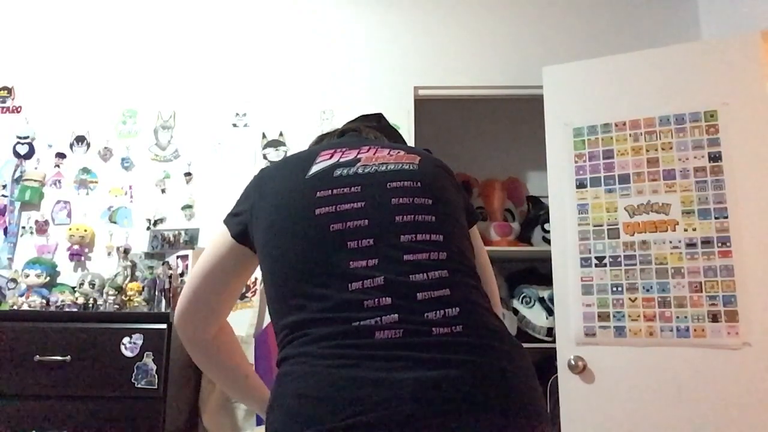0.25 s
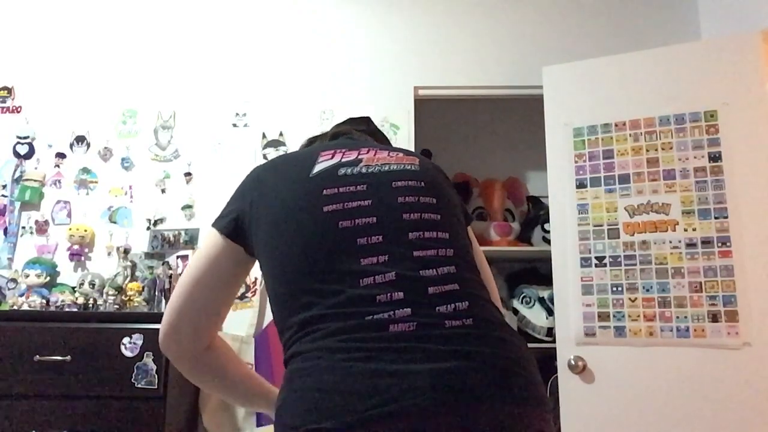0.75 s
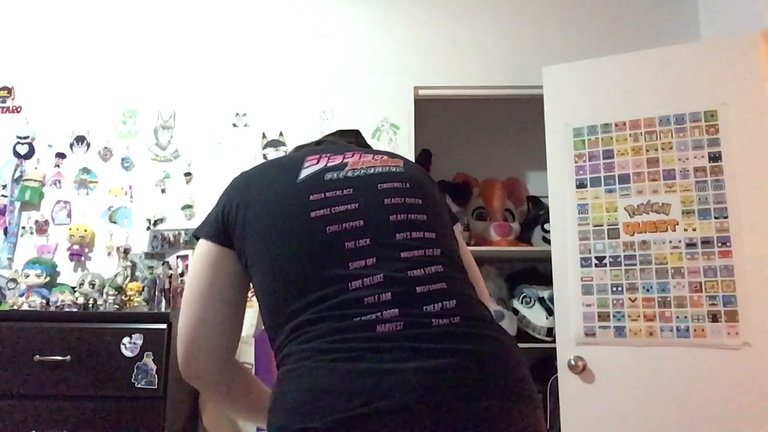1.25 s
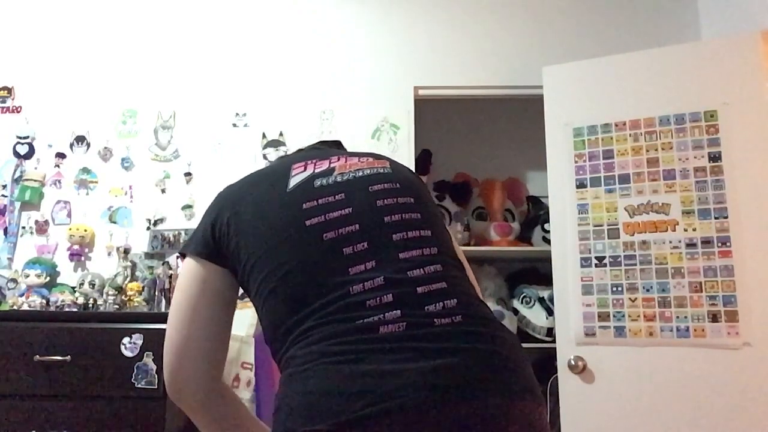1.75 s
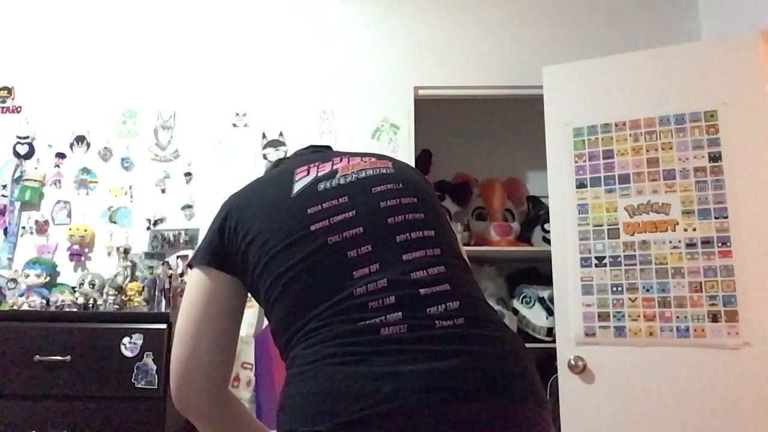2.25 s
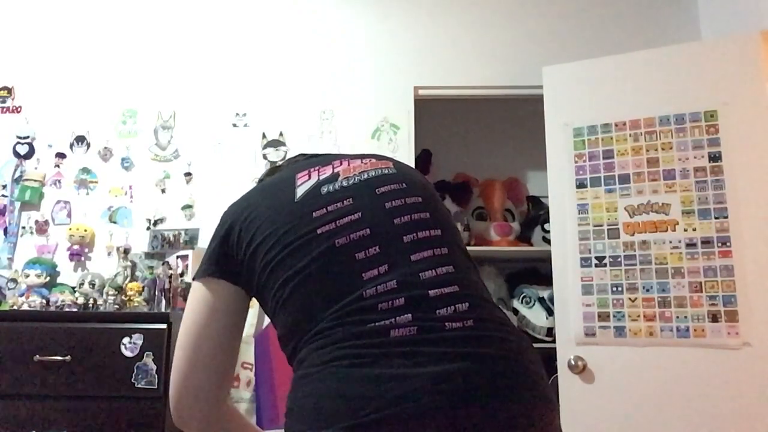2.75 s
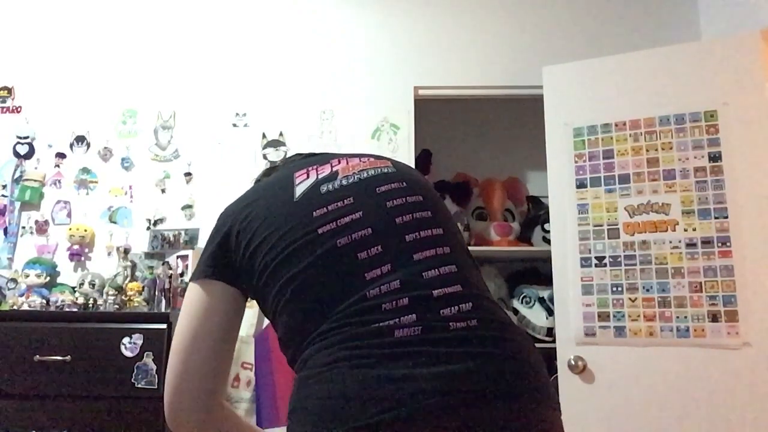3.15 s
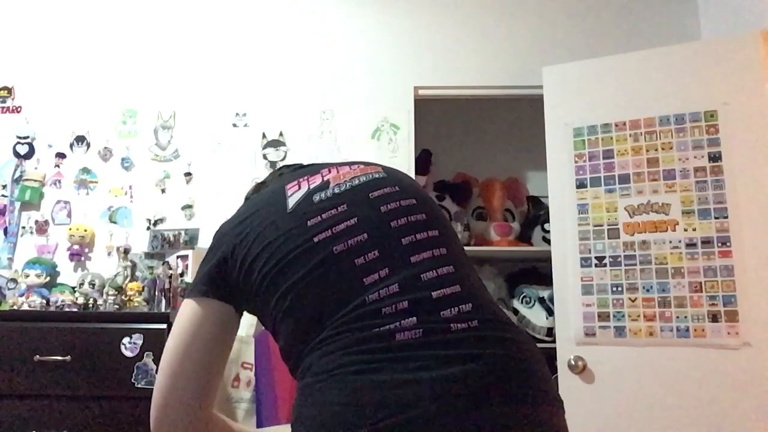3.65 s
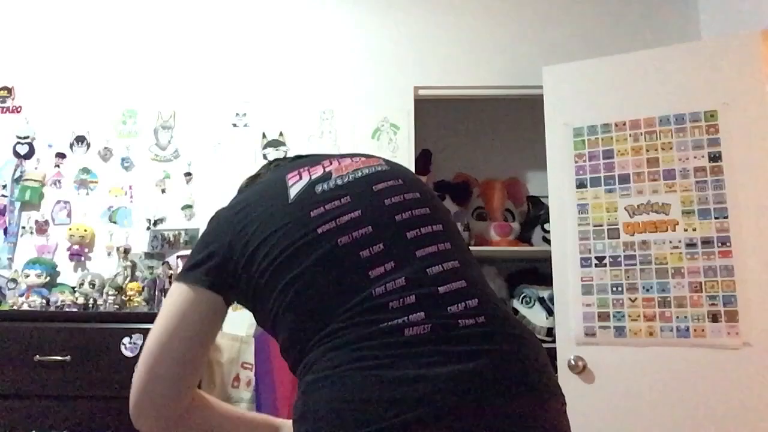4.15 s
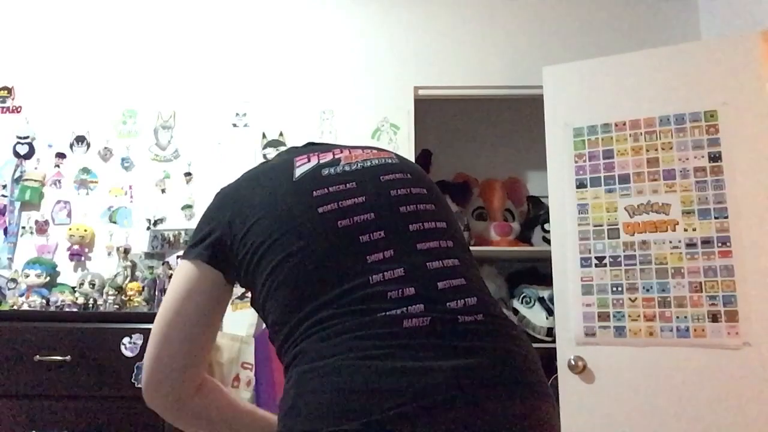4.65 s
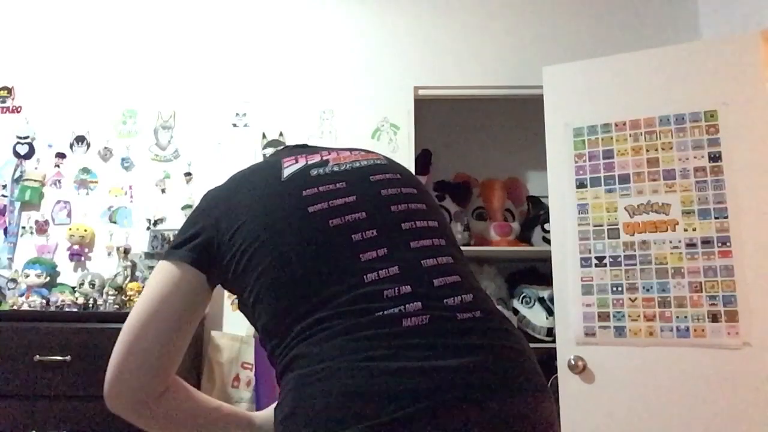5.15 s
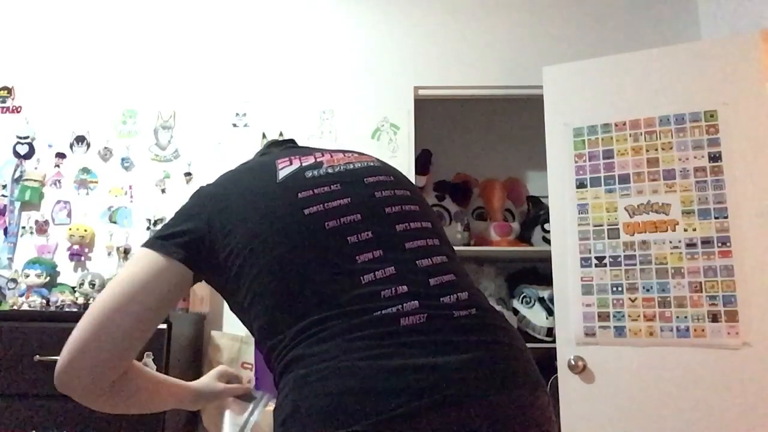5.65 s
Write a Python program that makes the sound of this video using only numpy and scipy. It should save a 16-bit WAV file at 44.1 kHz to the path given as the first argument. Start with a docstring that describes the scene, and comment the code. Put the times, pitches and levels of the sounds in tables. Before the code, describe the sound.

In a small, quiet furnished room, someone handles stiff wrapping a couple of metres from a small microphone. Faint rustles and tiny box taps come first, then short sharp crackles around two and a half and three and a half seconds. The loudest crumpling and hollow cardboard bumps come between about four and a half and five and a half seconds, then light crackles remain over faint hum.

```python
"""Unpacking a parcel

Someone unpacks a parcel by hand in a small furnished room, a couple of metres from the microphone.
Stiff wrapping slides, snaps and crumples in short pulls: crackles made of many tiny noise bursts.
The cardboard box bumps hollowly: short dying tones, coloured by ringing panels.
The crackle arrives mostly by way of the walls, over room air, a faint mains hum and a fading rush.
"""
import sys
import numpy as np
from scipy import signal
from scipy.fft import rfft, irfft
from scipy.io import wavfile
from scipy.ndimage import uniform_filter1d

SR = 44100
rng = np.random.default_rng(int(sys.argv[2]) if len(sys.argv) > 2 else 0)


def output_pcm(signal):
    """Save a mono or channel-first signal as 16-bit PCM at the path in sys.argv[1].

    Samples are clipped to [-1, 1] before scaling.
    """
    pcm = np.clip(np.atleast_2d(signal).T, -1, 1) * 32767
    wavfile.write(sys.argv[1], SR, np.round(pcm).astype(np.int16))


N = 260719
TIME = np.arange(N) / SR  # seconds

# All event levels below are set before the box and the room act on the sound.
# Pulls that crumple the wrapping:
# (time [s], length [s], level [dB], hollow body [dB], treble [dB])
PULLS = [(0.041, 0.033, -52, 5, 2.5), (0.548, 0.19, -52.5, 5, 6.5), (1.624, 0.0089, -49, -10, -7),
         (1.704, 0.035, -50.5, -4, 0), (2.274, 0.01, -38, -13, 10), (2.477, 0.0067, -26, 7, -4),
         (2.498, 0.024, -35, 4.5, 2.5), (2.553, 0.0044, -29, 3, 1.5), (2.818, 0.015, -49, -18, -20),
         (2.954, 0.014, -41, 10.5, 0.5), (3.43, .006, -41, 4.5, 5.5), (3.481, 0.037, -31, 0, -3.5),
         (3.509, 0.026, -21, -1, 2.5), (3.811, 0.016, -50, 2, 9), (3.938, 0.014, -50.5, 5.5, 10),
         (4.55, .04, -49, -8, 10), (4.599, 0.031, -23.5, 4.5, 3.5), (4.636, 0.073, -20, -4, -3.5),
         (4.722, 0.029, -38.5, 13, 4.5), (4.892, 0.0347, -35.5, 9, 7.5), (4.944, 0.01, -29, 15, 7),
         (4.986, 0.023, -30, 8.5, 4.5), (5.051, 0.0085, -31, 9, -7), (5.095, 0.027, -28.5, 3.5, -30),
         (5.153, 0.0093, -30, 4, -1), (5.218, 0.039, -16.5, 4, -8), (5.263, 0.047, -20, -1, -6.5),
         (5.596, 0.031, -46.5, -18, 6), (5.75, 0.018, -47.5, -9, 11.5)]
# Single creases that snap: (time [s], level [dB], ring pitch [Hz], ring against crack [dB])
SNAPS = [(0.54, -37.5, 4180, -2), (1.621, -33.5, 2840, 6), (2.108, -32.5, 3650, -1), (2.191, -36, 7000, -1),
         (2.249, -31, 3600, 9), (2.275, -25.5, 1720, 5), (2.432, -29.5, 3125, -11),
         (2.473, -16.5, 4300, -12), (2.546, -18, 2520, 3), (2.814, -33.5, 3550, 16),
         (2.993, -32.5, 3420, -6), (3.175, -41, 1910, 11), (3.342, -40, 1970, -7), (3.421, -30, 1810, -8),
         (3.481, -19, 2350, 18), (3.733, -41, 2500, 11), (3.895, -33.5, 2640, -4), (3.938, -30.5, 4530, -3),
         (4.216, -25, 4130, -28), (4.346, -31.5, 2220, -15), (4.599, -14.5, 4040, 5),
         (4.946, -25.5, 2030, 11), (5.02, -23, 2000, -7), (5.098, -11.5, 1750, -8), (5.209, -10.5, 1900, 0),
         (5.541, -26.5, 1860, -1), (5.616, -27, 7450, -5), (5.746, -27.5, 1670, 7), (5.843, -33.5, 2100, 4),
         (5.901, -32, 3010, 2)]
# Soft bumps on the box: (time [s], level [dB], pitch [Hz])
BUMPS = [(0.548, -43.5, 283), (0.625, -40, 273), (0.645, -47, 288), (2.482, -29.5, 760),
         (2.486, -28.5, 240), (2.965, -38, 248), (2.972, -41, 120.1), (3.541, -26, 298),
         (4.026, -38.5, 254), (4.050, -45, 308), (4.684, -20.5, 279), (4.756, -38, 120), (4.955, -35, 337),
         (5.020, -25, 407), (5.221, -14.5, 390), (5.254, -25, 145), (5.304, -24, 123), (5.440, -42.5, 173),
         (5.462, -39.5, 106.5), (5.565, -42.5, 427)]
# Strokes of wrapping sliding under the hands: (time [s], length [s], level [dB], treble [dB])
STROKES = [(0.106, 0.34, -61, 7.5), (0.666, 0.091, -53, -13), (0.908, .1, -55.5, -5),
           (1.11, 0.016, -59, -25), (1.388, 0.4, -60, 3), (1.835, 0.26, -65.5, 5.5), (2.079, 0.26, -60, 5),
           (2.577, 0.12, -59.5, -1), (2.879, .06, -63, -8), (3.228, 0.037, -59, -24),
           (3.575, 0.21, -58.5, -8), (3.957, 0.19, -57.5, -6), (4.194, .29, -55, 3),
           (4.488, 0.18, -44.5, 4.5), (4.847, 0.26, -44, 2), (5.272, 0.18, -48.5, -17),
           (5.511, 0.2, -54, -4), (5.882, 0.076, -43, -2)]
# Tone colour of crumpling wrapping: (frequency [Hz], level per Hz [dB])
WRAPPING_SPECTRUM = [(25, -36), (50, -51), (130, -10), (205, -14.5), (300, -0.5), (410, -4.5), (520, -7.5),
                     (800, -3.5), (1100, -8.5), (1650, -4.5), (2200, -8.5), (2900, -7), (5000, -12),
                     (7200, -9.5), (12500, -19), (15800, -26)]
# Tone colour of wrapping rubbing on itself: (frequency [Hz], level per Hz [dB])
RUBBING_SPECTRUM = [(100, -2.5), (300, 8), (600, 2), (1200, 1), (2800, -0.5), (5000, -3.5), (7500, -1.5),
                    (11000, -7.5), (15500, -14.5)]
# Tone colour of a snapping sheet: (frequency [Hz], level per Hz [dB])
SNAP_SPECTRUM = [(150, -11.0), (500, 4.0), (1200, 4.0), (3000, 3.5),
                 (5000, 2.0), (7500, 4.5), (13000, -4.5), (16000, -4.5)]
# Tone colour of still room air: (frequency [Hz], level per Hz [dB])
AIR_SPECTRUM = [(18, -75), (30, -7), (124, -1), (188, -7), (496, -16.5), (698, -18.5), (1490, -18.5),
                (2270, -24.5), (4040, -23), (5120, -34), (11500, -35), (13500, -28), (15800, -45)]
# Panel resonances of the box: (frequency [Hz], width [Hz], level [dB])
BOX_PANELS = [(153.2, 7.2, 10), (272, 34.9, -2), (388, 9.3, -3), (409.3, 5.1, 8), (785, 28, -1),
              (737, 14, -14), (926, 18.7, -7)]
# First reflections from floor, door and walls: (delay before random shift [s], level [dB])
WALL_ECHOES = [(.0052, -6.5), (.0098, -1.5), (0.0128, -4), (0.0167, -15), (.0215, -12.5), (.031, -13)]
# Time the room takes to fade by 60 dB: (frequency [Hz], fade time [s])
ROOM_DECAY = [(100, 0.37), (300, 0.2), (1000, 0.26), (3000, 0.3), (8000, 0.25), (16000, 0.24)]

HUM_HZ, HUM_DB, AIR_DB = 120, -64.5, -61.5
# a soft, dull rush that fades away at first
RUSH_DB, RUSH_HZ, RUSH_WIDTH_HZ, RUSH_FADE_S = -63.5, 850, 530, 0.92
# fingers feel round the box in a loose run of faint taps
FUMBLE_FROM_S, FUMBLE_TO_S, FUMBLE_DB, FUMBLE_HZ = 1.5, 2.2, -47.5, 287
CARDBOARD_DB = 2  # the broad panels radiate well
RESTING_DB = -71  # the wrapping keeps stirring faintly while it is held
# the hand speeds up over the first part of a stroke
STROKE_SWELL_SHARE, STROKE_RELEASE_S = 0.19, 0.027
# the grip bites at once and eases over the length of a pull
PULL_ATTACK_S, PULL_SAG_DB = 0.0013, -4
TOP_HZ = 15900  # highest pitch the microphone passes


def undb(db):
    """Turn decibels into a gain."""
    return 10 ** (np.asarray(db) / 20)


def unit(x):
    """Scale to an average (rms) level of 1."""
    return x / np.sqrt(np.mean(x ** 2) + 1e-20)


def along(points, hz):
    """Read between (frequency [Hz], value) points, with frequency on a log scale."""
    f, value = np.transpose(points)
    return np.interp(np.log(np.maximum(hz, 1)), np.log(f), value)


def convolve(x, response):
    """Filter by an impulse response, keeping the length."""
    return signal.oaconvolve(x, response)[:len(x)]


def colour(x, spectrum, size=2048):
    """Give a sound a tone colour without smearing it backwards; white noise keeps its power."""
    gain = undb(along(spectrum, np.fft.rfftfreq(size, 1 / SR)))
    # folding the cepstrum packs the response as early as possible
    cepstrum = irfft(np.log(gain))
    cepstrum[1:size // 2] *= 2
    cepstrum[size // 2 + 1:] = 0
    response = irfft(np.exp(rfft(cepstrum)))
    return convolve(x, response / np.linalg.norm(response))


def shelf(x, hz, db, kind):
    """Raise or lower everything below ("low" pass) or above ("high" pass) a corner."""
    part = signal.sosfilt(signal.butter(1, hz, "low" if kind == "low" else "high", fs=SR, output="sos"), x)
    return x + (undb(db) - 1) * part


def resonate(x, hz, width_hz):
    """Ring at one pitch, with gain 1 at its centre."""
    b, a = signal.iirpeak(hz, hz / width_hz, fs=SR)
    return signal.lfilter(b, a, x)


def add(track, s, x):
    """Mix a sound in at a time in seconds."""
    start = max(int(s * SR), 0)
    track[start:start + len(x)] += x[:max(N - start, 0)]


def crackle(t, rate, spread_db, grain_s):
    """Tiny creases buckle at random (rate per second): short bursts, most weak and a few strong."""
    size = undb(spread_db * np.minimum(rng.exponential(size=len(t)), 4))
    buckles = rng.random(len(t)) < rate / SR
    energy = buckles * size ** 2
    # the energy of each burst dies away within about grain_s
    energy = signal.lfilter([1], [1, -np.exp(-1 / (grain_s * SR))], energy)
    return unit(np.sqrt(energy) * rng.standard_normal(len(t)))


def background(waver=0.54):
    """Still room air is coloured noise; the mains hum is one slightly wavering tone."""
    knots = TIME[::SR // 8]
    drift = np.interp(TIME, knots, rng.standard_normal(len(knots)))
    hum = np.sqrt(2) * np.sin(2 * np.pi * HUM_HZ * TIME) * (1 + waver * drift)
    air = unit(colour(rng.standard_normal(N), AIR_SPECTRUM))
    return undb(HUM_DB) * hum + undb(AIR_DB) * air


def rush():
    """A faint mid-range rush: noise through two equal resonances, fading into the room air."""
    noise = resonate(rng.standard_normal(N), RUSH_HZ, RUSH_WIDTH_HZ)
    noise = resonate(noise, RUSH_HZ, RUSH_WIDTH_HZ)
    fade = np.exp(-(TIME / RUSH_FADE_S) ** 2)
    return undb(RUSH_DB) * unit(noise) * fade


def fumble(scatter_db=2.0, pitch_scatter=0.18, count=8):
    """Faint finger taps at uneven intervals: rows of (time [s], level [dB], pitch [Hz])."""
    # each random value lies between -1 and 1
    late, strong, high = (2 * rng.random((count, 3)) - 1).T
    progress = (np.arange(count) + .5 + late / 2) / count
    s = FUMBLE_FROM_S + (FUMBLE_TO_S - FUMBLE_FROM_S) * progress
    db = FUMBLE_DB + scatter_db * strong
    hz = FUMBLE_HZ * (1 + pitch_scatter * high)
    return list(zip(s, db, hz))


def bumps(contact_s=0.0014):
    """A hand or the contents nudge the cardboard, which swings for a few cycles."""
    out, t = np.zeros(N), TIME[:SR // 8]
    for s, db, hz in list(BUMPS) + fumble():
        push = 1 - np.exp(-t / contact_s)
        fade = np.exp(-t * hz / 1.09)  # higher pitches die sooner
        swing = push * fade * np.sin(2 * np.pi * hz * t)
        add(out, s, undb(db) * swing / np.abs(swing).max())
    # the deep bass below the bumps is cut away
    return shelf(out, 75, -21, "low")


def slide(treble_hz=5500):
    """Wrapping rubs on itself: a fine, dense crackle that swells, holds and dies with each stroke."""
    grains = crackle(TIME, rate=1300, spread_db=5.0, grain_s=0.00059)
    grains = colour(grains, RUBBING_SPECTRUM)
    out = undb(RESTING_DB) * grains
    for s, length, db, treble_db in STROKES:
        swell = np.clip((TIME - s) / (STROKE_SWELL_SHARE * length), 0, 1)
        release = np.exp(-np.clip(TIME - s - length, 0, 1) / STROKE_RELEASE_S)
        out = out + undb(db) * swell * release * shelf(grains, treble_hz, treble_db, "high")
    return out


def snaps(crack_s=0.0008, ring_width=0.52, settle_db=-15, settle_s=0.013):
    """A crease flips with a crack, its facet rings briefly and smaller creases settle after it."""
    out, t = np.zeros(N), TIME[:SR // 10]
    for s, db, hz, ring_db in SNAPS:
        crack = rng.standard_normal(len(t)) * np.exp(-t / crack_s)
        settling = np.exp(-t / settle_s) * crackle(t, rate=270, spread_db=0, grain_s=0.0011)
        sheet = colour(crack + undb(settle_db) * settling, SNAP_SPECTRUM)
        ring = unit(resonate(sheet, hz, ring_width * hz))
        snap = unit(unit(sheet) + undb(ring_db) * ring)
        # the level belongs to the short crack, not to the whole window
        add(out, s, undb(db) * snap * np.sqrt(crack_s / t[-1]))
    return out


def pulls(release_s=0.0023, body_hz=520, treble_hz=3200):
    """Each pull sets off an avalanche of creases; a large fold also shakes the sheet low down."""
    out, t = np.zeros(N), TIME[:SR // 4]
    for s, length, db, body_db, treble_db in PULLS:
        bite = 1 - np.exp(-t / PULL_ATTACK_S)
        sag = undb(PULL_SAG_DB * (np.minimum(t / length, 1) - .5))
        release = np.exp(-np.maximum(t - length, 0) / release_s)
        force = bite * sag * release
        creases = force * crackle(t, rate=1300, spread_db=4.5, grain_s=0.00023)
        # the average level follows the force, whatever creases were drawn
        creases = unit(creases) * np.sqrt(np.mean(force ** 2))
        creases = colour(creases, WRAPPING_SPECTRUM)
        creases = shelf(creases, body_hz, body_db, "low")
        add(out, s, undb(db) * shelf(creases, treble_hz, treble_db, "high"))
    return out


def box(x, panel_db=-7):
    """The box panels ring along with whatever is handled inside."""
    ringing = sum(undb(db) * resonate(x, hz, width) for hz, width, db in BOX_PANELS)
    return x + undb(panel_db) * ringing


def room(x, wet_db, tail_db=1, build_s=0.011, shade_hz=6000, shade_db=-7, count=9):
    """Direct sound, a cluster of early reflections, then a diffuse tail that dulls as it dies."""
    t = TIME[:SR // 3]
    noise, freqs = rfft(rng.standard_normal(len(t))), np.fft.rfftfreq(len(t), 1 / SR)
    # split the noise into octave bands, each with its own decay
    centres = TOP_HZ / 2 ** np.arange(count)[::-1]
    tail = 0
    for hz, weights in zip(centres, np.eye(count)):
        band = irfft(noise * along(np.c_[centres, weights], freqs), len(t))
        tail = tail + band * np.exp(-np.log(1000) * t / along(ROOM_DECAY, hz))
    tail = tail * (1 - np.exp(-(t / build_s) ** 2))
    response = undb(tail_db) * tail / np.linalg.norm(tail)
    for delay, db in WALL_ECHOES:
        # cluttered surfaces smear each reflection
        scatter = rng.standard_normal(SR // 100) * np.exp(-t[:SR // 100] / 0.00025)
        echo = undb(db) * scatter / np.linalg.norm(scatter)
        add(response, delay * rng.uniform(.93, 1.07), echo)
    response = undb(wet_db) * response
    # the bent back of the person shades the direct path, so the first echoes are brighter
    click = 1. * (t == 0)
    add(response, 0, shelf(click, shade_hz, shade_db, "high"))
    return convolve(x, response / np.linalg.norm(response))


def roam(x, dwell_s=.013, count=7):
    """Creases break at several places on the sheet in turn, each with its own paths round the room."""
    place = (TIME / dwell_s).astype(int) % count
    out = 0
    for k in range(count):
        # a short average blends each place into the next
        share = np.sqrt(np.abs(uniform_filter1d(1. * (place == k), SR // 200)))
        out = out + room(x * share, wet_db=0.1)
    return out


def scene():
    """Wrapping and bumps pass through box and room; the broad cardboard is heard more directly."""
    wrapping = roam(box(pulls() + snaps() + slide()))
    cardboard = undb(CARDBOARD_DB) * room(box(bumps()), wet_db=-4.5)
    return (wrapping + cardboard + background() + rush())[None]


def record(dry, low_cut_hz=43):
    """A small microphone: thin in the deep bass, cut off at the top."""
    low_cut = signal.butter(4, low_cut_hz, "high", fs=SR, output="sos")
    top_cut = signal.ellip(10, .2, 80, TOP_HZ, fs=SR, output="sos")
    return signal.sosfilt(top_cut, signal.sosfilt(low_cut, dry))


dry = scene()
out = record(dry)
output_pcm(out)
```